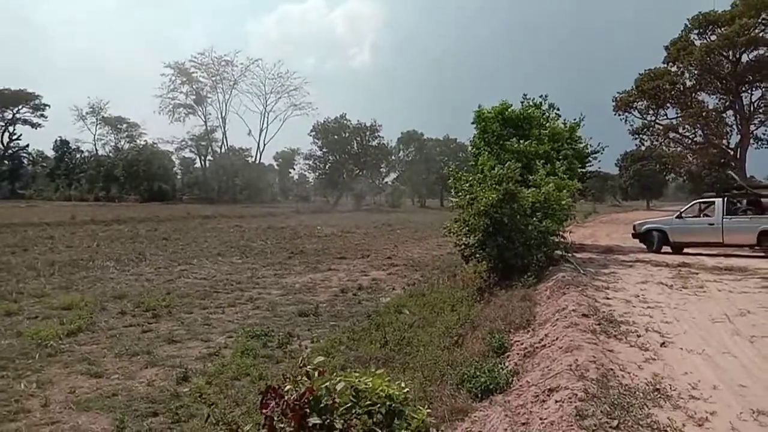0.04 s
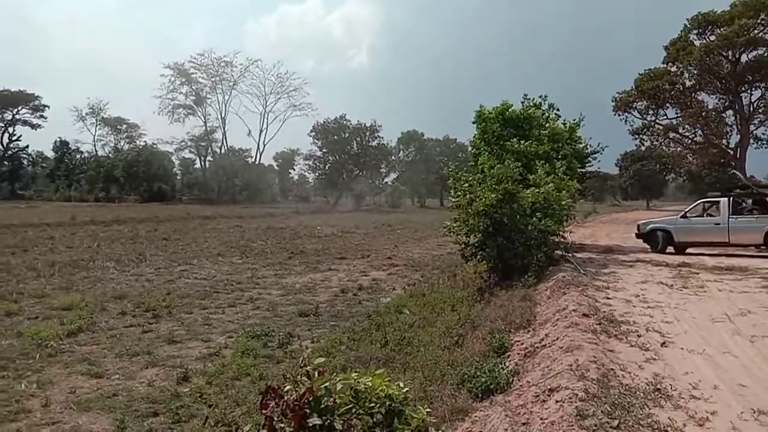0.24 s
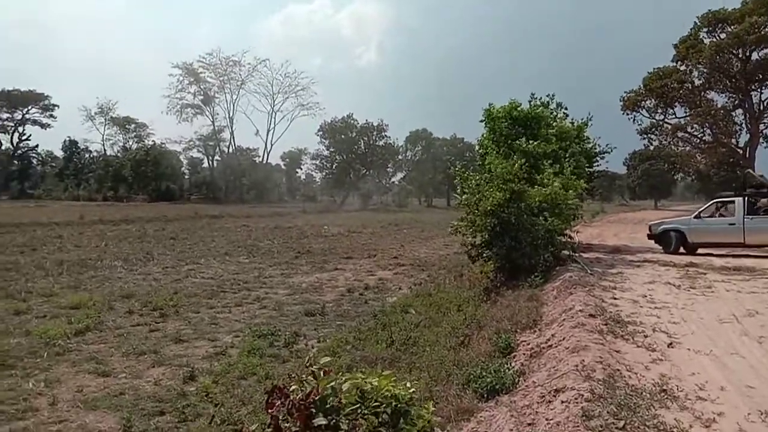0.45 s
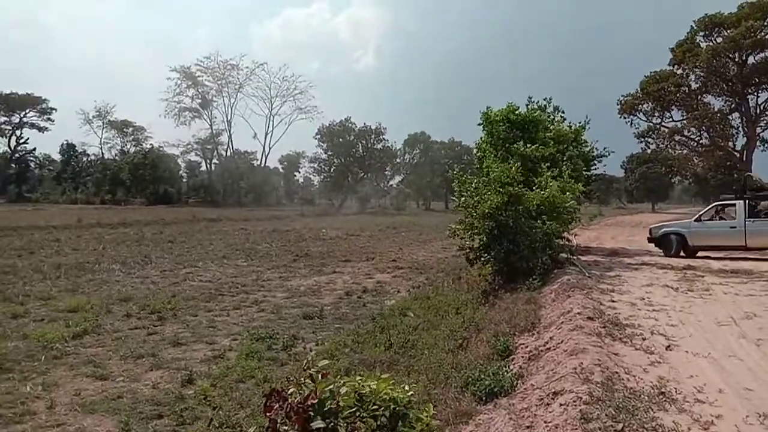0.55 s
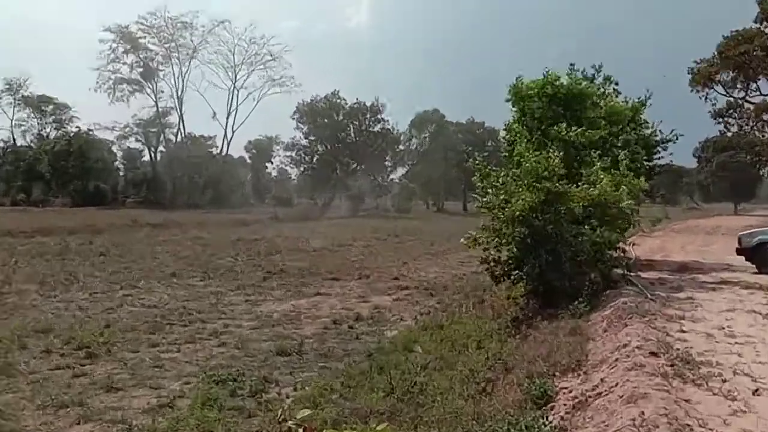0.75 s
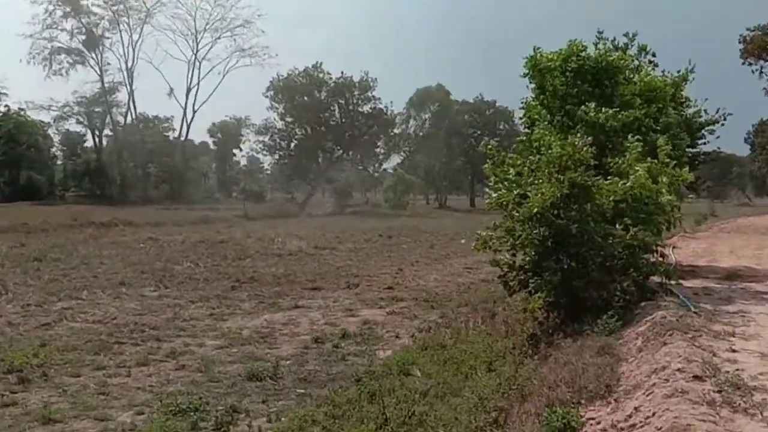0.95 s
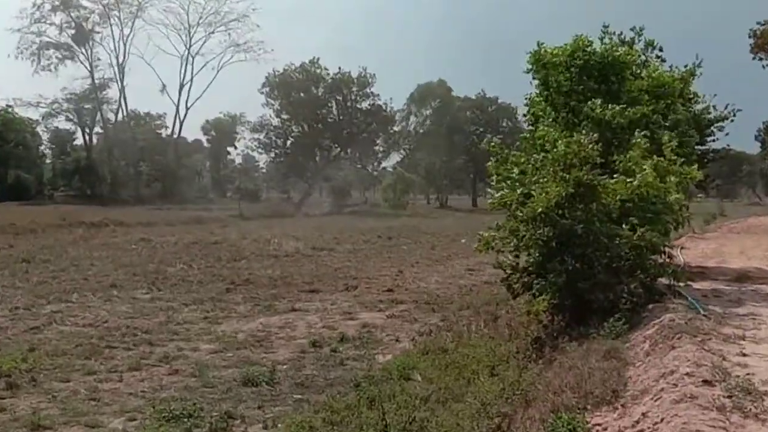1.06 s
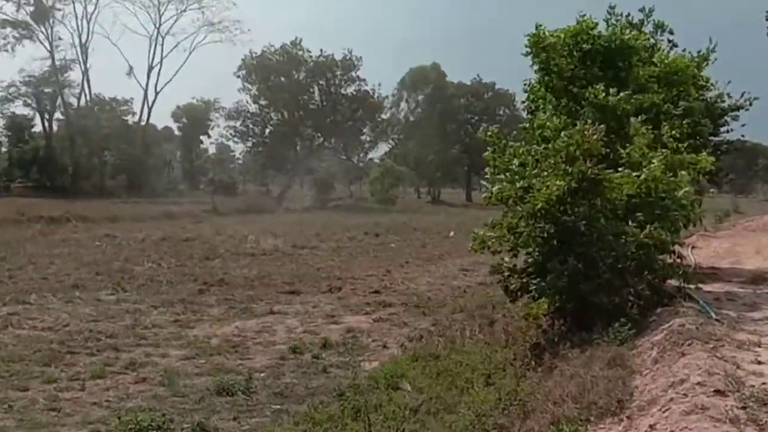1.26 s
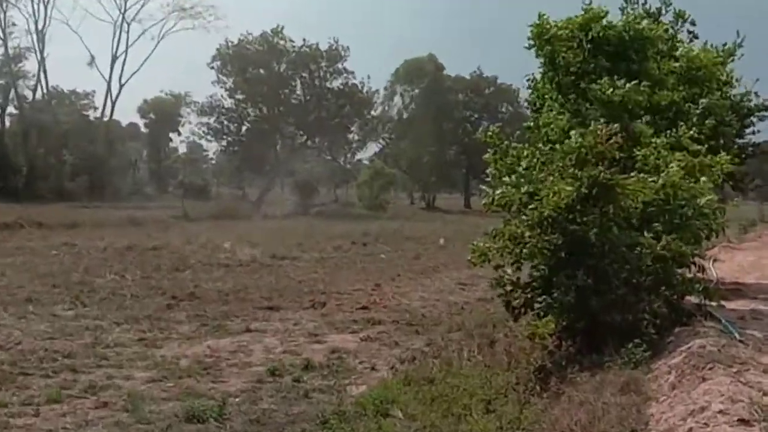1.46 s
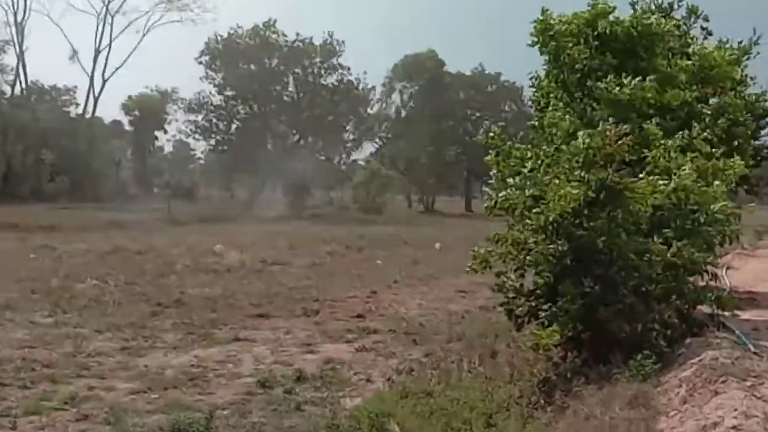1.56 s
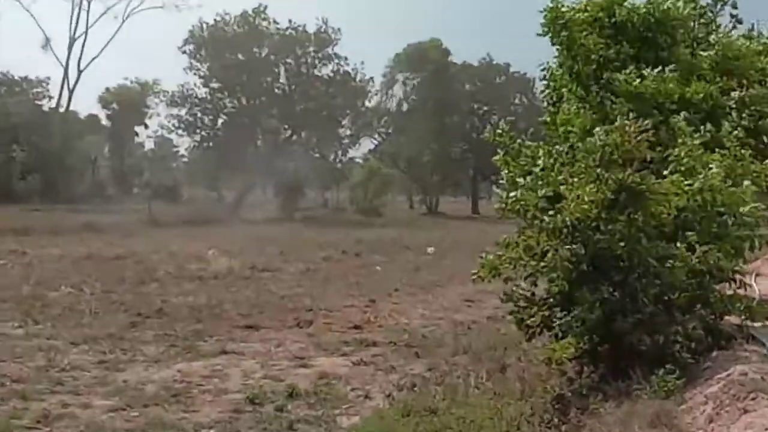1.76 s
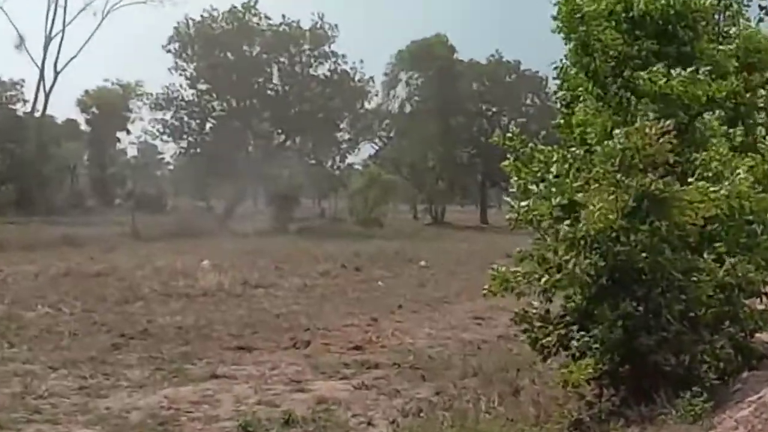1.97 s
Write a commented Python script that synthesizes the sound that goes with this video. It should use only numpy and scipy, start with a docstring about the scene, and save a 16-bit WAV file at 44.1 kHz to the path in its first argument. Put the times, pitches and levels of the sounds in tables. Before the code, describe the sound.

Gusty wind buffets the microphone with low thumps, fading amid small ticks and scuffs.

```python
"""A dry field, where gusts buffet a phone's microphone: blunt low thumps over a wavering rumble that
dies away. A drone near 140 Hz, perhaps a pickup's engine, throbs underneath. Dry leaves hiss and crackle
in the wind over faint distant ambience. Something crunches against the phone, its lens motor ticks
quickly, and its case knocks and rattles in small scuffs. Late on comes one faint, far blip."""
import sys
import numpy as np
from scipy import signal
from scipy.fft import rfft, irfft
from scipy.io import wavfile
from scipy.ndimage import uniform_filter1d

SR = 44100
rng = np.random.default_rng(int(sys.argv[2]) if len(sys.argv) > 2 else 0)


def transcribe(signal):
    """Save signal, clipped to [-1, 1], as a 16-bit WAV file at the path in sys.argv[1]."""
    frames = np.atleast_2d(signal).T
    limited = np.clip(frames, -1, 1)
    pcm = np.round(limited * 32767).astype(np.int16)
    wavfile.write(sys.argv[1], SR, pcm)


N = 89170

# Gusts hitting the mic. Each row: peak time in seconds, length in seconds, level in dB,
# eddy rate in Hz, roughness in dB relative to the eddies.
BUFFETS = [(0.07, 0.085, -34.5, 84.2, -8.5), (0.1, 0.013, -32, 188.7, 6.5), (0.392, 0.016, -32, 125, 0),
           (0.421, 0.016, -17, 104.2, -9), (0.495, 0.047, -32, 105, -27), (0.683, 0.029, -23, 80, -6.5),
           (0.711, 0.0095, -28, 200.9, -3), (0.804, 0.031, -20.5, 136, -11),
           (0.838, 0.021, -21.5, 85, -11.5), (0.903, 0.019, -24.5, 185, -6),
           (0.932, 0.021, -17.5, 87.4, -18.5), (1.048, 0.015, -24, 134.4, -11.5),
           (1.088, 0.038, -22.5, 111.4, -20.5), (1.357, 0.0096, -27, 98.1, -32),
           (1.568, 0.023, -23.5, 98.1, -36), (1.601, 0.019, -24.5, 125, -33)]
# Fader ride of the wind rumble. Each row: time in seconds, level in dB.
RUMBLE_RIDE = [(0, -33), (.1, -31.5), (.3, -34), (.47, -27), (.6, -37), (.78, -31), (.87, -52), (.97, -35),
               (1.1, -36.5), (1.48, -41.5), (1.65, -40.5), (1.74, -54), (2.02, -64)]
# Bass-heavy EQ of the rumble. Each row: frequency in Hz, relative level in dB.
RUMBLE_EQ = [(20, -75), (42, -5), (65, -5), (95, 6.5), (160, 2), (250, -12.5), (400, -19), (700, -34),
             (1500, -52)]

# Fader ride of the drone. Each row: time in seconds, level in dB.
DRONE_RIDE = [(0, -26), (.07, -35), (.24, -28), (.29, -38.5), (.32, -29), (.4, -34), (.5, -33),
              (.62, -34.5), (.85, -43), (1.0, -35.5), (1.14, -32), (1.22, -69)]
# Late throbs of the drone. Each row: peak time in seconds, length in seconds, level in dB.
THROBS = [(1.261, 0.032, -31.5), (1.459, 0.025, -32), (1.764, 0.023, -33.5), (1.908, 0.025, -34.5)]

# Fader ride of the leaves. Each row: time in seconds, level in dB.
LEAF_RIDE = [(0, -52), (.4, -47.5), (.68, -53), (1.1, -54), (1.25, -50.5), (1.52, -46.5), (1.58, -48.5),
             (1.7, -51), (2.02, -52)]
# Papery EQ of the leaves. Each row: frequency in Hz, relative level in dB.
LEAF_EQ = [(1500, 8.5), (2500, -8), (3200, 1.5), (3750, 3), (4500, -5.5), (5500, 6), (6100, 0.5),
           (6800, 10), (7400, 10.5), (8000, 0), (9300, 2), (11500, -8), (13500, -20.5), (15500, -11)]
# Swells in the leaves. Each row: peak time in seconds, length in seconds, level in dB.
RUSTLES = [(1.531, 0.011, -57), (1.664, 0.016, -52.5), (1.778, 0.019, -49.5)]
# Hollow resonances of the phone's mic and case. Each row: pitch in Hz, width in Hz, level in dB.
PHONE_MODES = [(1337, 150, -65.5), (1813, 144, -60), (3774, 400, -61.5)]

# Fader ride of the distant ambience. Each row: time in seconds, level in dB.
AMBIENCE_RIDE = [(0, -49), (1.3, -56.5), (1.65, -50)]
# Dull EQ of the ambience. Each row: frequency in Hz, relative level in dB.
AMBIENCE_EQ = [(100, 15), (260, 15), (340, 3.5), (510, 12.5), (720, -1.5), (930, 8.5), (1100, -12.5),
               (1290, 9), (1580, -25), (1830, 5.5), (3000, -5.5), (6000, -47)]

# Fader rides of the brush's body and hiss. Each row: time in seconds, level in dB.
BODY_RIDE = [(.04, -52.5), (.1, -37.5), (.14, -27), (.165, -28.5), (.2, -37), (.25, -42.5), (.32, -50),
             (.46, -47.5), (.58, -105)]
HISS_RIDE = [(.04, -58), (.1, -57), (.125, -39.5), (.158, -31), (.205, -38.5), (.255, -40), (.3, -58),
             (.42, -53.5), (2.02, -104)]
# EQs of the same two layers. Each row: frequency in Hz, relative level in dB.
BODY_EQ = [(120, -2), (260, 4), (540, 2), (800, -6), (1000, -11), (1500, -10), (2200, -25), (5000, -50)]
HISS_EQ = [(600, -4.5), (1400, 2.5), (2600, 6.5), (4500, -2), (6000, 3.5), (7100, -1.5), (8000, -16),
           (10000, -14.5), (13500, -23), (15500, -9)]

# Quick ticks of the lens motor. Each row: start in seconds, level in dB, ring pitch in Hz.
TICKS = [(0.047, -43.5, 5700), (0.08, -45, 5700), (0.115, -39, 5860), (0.247, -30.5, 5700),
         (0.279, -34, 5360), (.312, -29.5, 7060), (.344, -35, 5500), (0.375, -29, 5530), (.44, -35, 7100),
         (0.47, -39.5, 5600), (0.504, -34.5, 5550), (.573, -40, 7340), (0.644, -43.5, 7250),
         (0.807, -42.5, 5530), (0.895, -41.5, 6200), (.987, -44.5, 5500), (1.162, -44, 5340)]
# Bright resonances of the ticks. Each row: pitch in Hz, width in Hz, relative level in dB.
TICK_MODES = [(3340, 400, -4.5), (6560, 1650, 7.5), (9200, 670, -10)]

# Knocks and scuffs on the case. Each row: start in seconds, level in dB.
KNOCKS = [(.094, -28), (.365, -32.5), (.961, -43)]
SCUFFS = [(.25, -39), (.378, -38), (.44, -42.5), (.503, -40.5), (.571, -43.5), (.608, -43), (.72, -42),
          (.897, -43.5), (1.073, -46), (1.119, -46), (1.16, -44), (1.204, -47.5), (1.243, -43.5),
          (1.279, -41.5), (1.317, -40), (1.397, -39.5), (1.431, -39), (1.548, -48), (1.579, -39.5),
          (1.652, -46.5), (1.726, -39.5), (1.843, -46), (1.875, -44.5), (1.99, -45.5)]
# Case resonances for knocks and scuffs. Each row: pitch in Hz, width in Hz, relative level in dB.
KNOCK_MODES = [(565, 650, 12), (875, 600, -1), (1250, 41, 10.5)]
SCUFF_MODES = [(487, 100, 2), (894, 97, -0.5), (1274, 46, 4.5), (1396, 104, 6.5), (1848, 250, 10.5),
               (2510, 290, 5.5), (3630, 370, 2)]


def undb(db):
    """Decibels to gain."""
    return 10 ** (np.asarray(db) / 20)


def unit(x):
    """Scale to rms 1."""
    return x / np.sqrt(np.mean(x ** 2))


def clock():
    """Time of each sample in seconds."""
    return np.arange(N) / SR


def fader(ride):
    """Gain gliding through points of time and level."""
    return undb(np.interp(clock(), *np.array(ride).T))


def drift(rate_hz):
    """Smooth random modulation of rms 1, rolling off above the rate."""
    freqs = np.arange(N // 2 + 1) * SR / N
    spectrum = rfft(rng.standard_normal(N)) * np.exp(-(freqs / rate_hz) ** 2)
    return unit(irfft(spectrum * (freqs > 0), N))


def noise(eq):
    """Noise of rms 1 through an EQ curve, rolled off below its first point."""
    hz, db = np.array(eq).T
    freqs = np.arange(N // 2 + 1) * SR / N + 1
    gain = undb(np.interp(np.log(freqs), np.log(hz), db))
    low_cut = np.minimum(freqs / hz[0], 1) ** 2
    return unit(irfft(rfft(rng.standard_normal(N)) * gain * low_cut, N))


def ring(hz, width_hz):
    """Pitched noise of rms 1, run twice through a resonator of this width."""
    b, a = signal.iirpeak(hz, hz / width_hz, fs=SR)
    once = signal.lfilter(b, a, rng.standard_normal(N))
    return unit(signal.lfilter(b, a, once))


def swell(at, length_s):
    """A bell-shaped rise and fall."""
    return np.exp(-2 * ((clock() - at) / length_s) ** 2)


def running_phase(hz):
    """Phase of an oscillator following a moving pitch, from a random start."""
    return 2 * np.pi * (np.cumsum(hz) / SR + rng.random())


def grit(grains_per_s, decay_s, share):
    """Gain of rms 1 with a share of its power in short random grains."""
    spread_db = 11
    grains = undb(-spread_db * rng.random(N)) * (rng.random(N) < grains_per_s / SR)
    power = signal.lfilter([1], [1, -np.exp(-2 / (decay_s * SR))], grains ** 2)
    return np.sqrt(1 - share + share * power / power.mean())


def transient(at, attack_s, decay_s):
    """Envelope with a quick rise, then a fade."""
    age = clock() - at
    return np.clip(age / attack_s, 0, 1) * np.exp(-np.maximum(age - attack_s, 0) / decay_s)


def wind():
    """Each buffet is a few uneven pressure swings with finer turbulence on top, over a bed of rumble."""
    wander, skew = 0.17, 0.13  # skew sharpens the pressure crests
    out = noise(RUMBLE_EQ) * fader(RUMBLE_RIDE)
    for at, length, db, eddy_hz, rough_db in BUFFETS:
        phase = running_phase(eddy_hz * np.exp(wander * drift(rate_hz=98.8)))
        eddies = np.sqrt(2) * (np.sin(phase) - skew * np.cos(2 * phase))
        turbulence = ring(hz=232.4, width_hz=91) + undb(-14) * ring(hz=407, width_hz=102)
        out += undb(db) * swell(at, length) * (eddies + undb(rough_db) * turbulence)
    return out


def drone():
    """A wavering low tone that breaks up into separate throbs."""
    pitch_hz, wander = 143.7, 0.05
    phase = running_phase(pitch_hz * (1 + wander * drift(rate_hz=23)))
    throbs = sum(undb(db) * swell(at, length) for at, length, db in THROBS)
    return np.sqrt(2) * (fader(DRONE_RIDE) + throbs) * np.sin(phase)


def dry_leaves():
    """Leaves flutter in the wind: a flickering, crackling hiss."""
    flicker_db = 1.44
    level = fader(LEAF_RIDE) + sum(undb(db) * swell(at, length) for at, length, db in RUSTLES)
    hiss = noise(LEAF_EQ) * level * undb(flicker_db * drift(rate_hz=35))
    return hiss * grit(grains_per_s=130, decay_s=0.002, share=0.5)


def phone_resonance():
    """Hollow, flickering resonances of the phone's microphone and case, colouring the rustle."""
    flicker_db = 4.5
    return sum(ring(hz, width) * undb(db + flicker_db * drift(rate_hz=43))
               for hz, width, db in PHONE_MODES)


def ambience():
    """The distant wash of open country, its level flickering."""
    flicker_db = 3
    return noise(AMBIENCE_EQ) * fader(AMBIENCE_RIDE) * undb(flicker_db * drift(rate_hz=22))


def brush():
    """Something crunches along the phone and rings its case: a grainy low body and a bright hiss."""
    body = noise(BODY_EQ) + undb(-7.5) * ring(hz=1266, width_hz=40)
    hiss = noise(HISS_EQ)
    crunch = grit(grains_per_s=500, decay_s=0.0016, share=0.7)
    return (body * fader(BODY_RIDE) + hiss * fader(HISS_RIDE)) * crunch


def lens_ticks():
    """The lens motor ticks crisply: shared bright resonances and a brief ring at each tick's pitch."""
    bright = unit(sum(undb(db) * ring(hz, width) for hz, width, db in TICK_MODES))
    out = np.zeros(N)
    for at, db, hz in TICKS:
        tone = unit(bright + ring(hz, width_hz=700))
        out += undb(db) * transient(at, attack_s=0.001, decay_s=0.0042) * tone
    return out


def case_hits(hits, modes, attack_s, decay_s):
    """Gritty knocks or scuffs: each sounds the case's resonances in a slightly different balance."""
    scatter_db = 1.5
    rings = np.array([undb(db) * ring(hz, width) for hz, width, db in modes])
    rings /= np.std(rings.sum(axis=0))
    out = np.zeros(N)
    for at, db in hits:
        balance = unit(undb(scatter_db * rng.standard_normal(len(modes))))
        out += undb(db) * transient(at, attack_s, decay_s) * (balance @ rings)
    return out


def far_blip():
    """One faint, short swell of pitched noise."""
    return undb(-45.5) * swell(at=1.489, length_s=0.021) * ring(hz=965, width_hz=140)


def scene():
    """Low end, phone noises and the background, mixed in mono."""
    low_end = wind() + drone()
    crunch = brush()
    scuffs = case_hits(SCUFFS, SCUFF_MODES, attack_s=0.0035, decay_s=0.017)
    ticks = lens_ticks()
    knocks = case_hits(KNOCKS, KNOCK_MODES, attack_s=0.0018, decay_s=0.0073)
    background = dry_leaves() + phone_resonance() + ambience() + far_blip()
    return (low_end + crunch + ticks + knocks + scuffs + background)[None]


def record(dry):
    """The phone thins the deepest bass, ducks the treble under strong buffets and cuts the top."""
    low_cut_hz, crossover_hz, high_cut_hz = 40, 500, 15550
    sidechain_hz, knee_db, smooth_s = 115, -23.5, 0.02
    thinned = signal.sosfilt(signal.butter(2, low_cut_hz, "high", fs=SR, output="sos"), dry)
    sidechain = signal.sosfiltfilt(signal.butter(2, sidechain_hz, fs=SR, output="sos"), thinned)
    drive = uniform_filter1d(sidechain ** 2, int(smooth_s * SR)) / undb(knee_db) ** 2
    bass = signal.sosfiltfilt(signal.butter(2, crossover_hz, fs=SR, output="sos"), thinned)
    ducked_treble = (thinned - bass) / np.sqrt(1 + drive)
    high_cut = signal.ellip(10, 0.2, 80, high_cut_hz, fs=SR, output="sos")
    return signal.sosfilt(high_cut, bass + ducked_treble)


dry = scene()
out = record(dry)
transcribe(out)
```